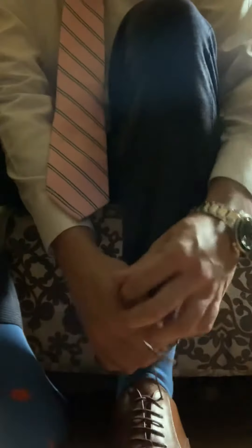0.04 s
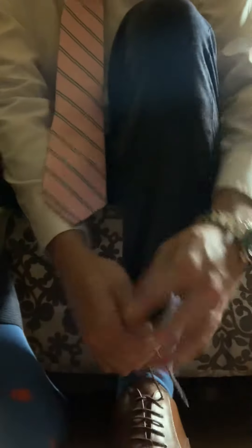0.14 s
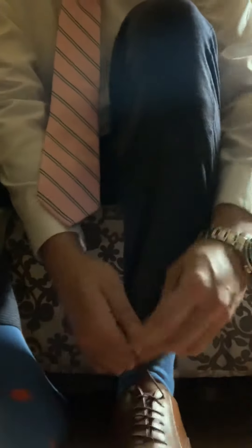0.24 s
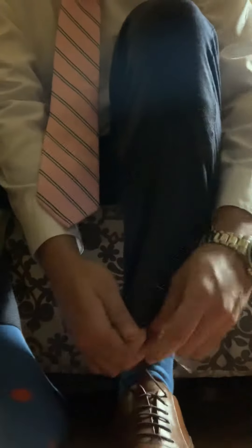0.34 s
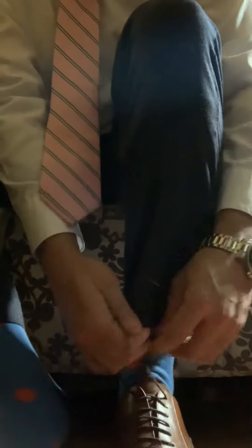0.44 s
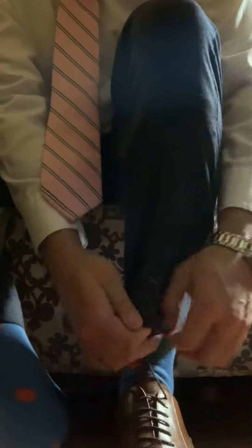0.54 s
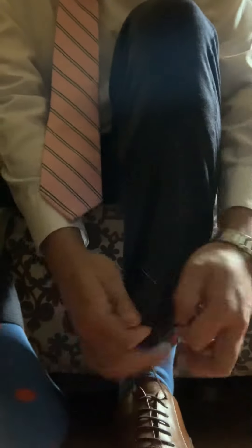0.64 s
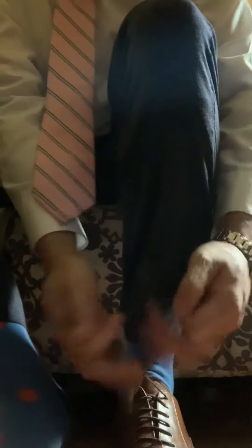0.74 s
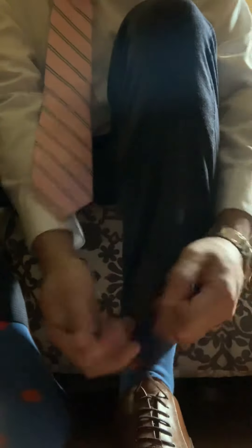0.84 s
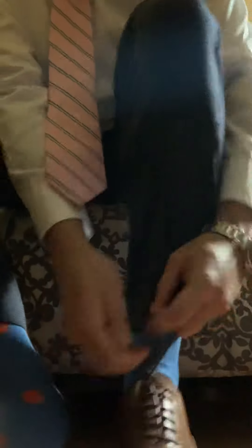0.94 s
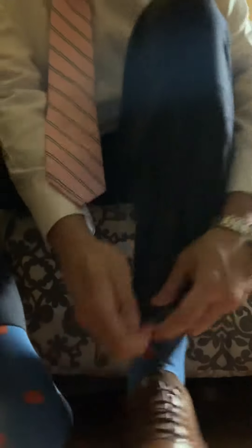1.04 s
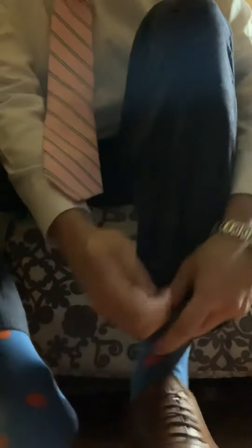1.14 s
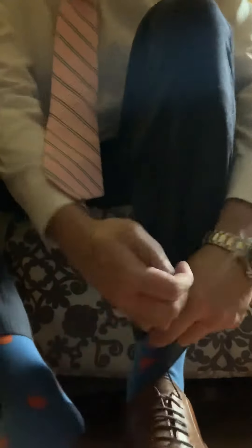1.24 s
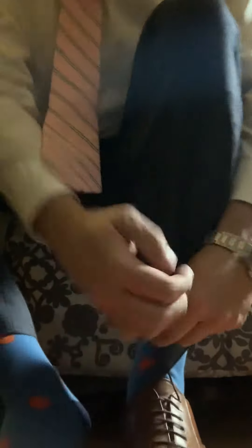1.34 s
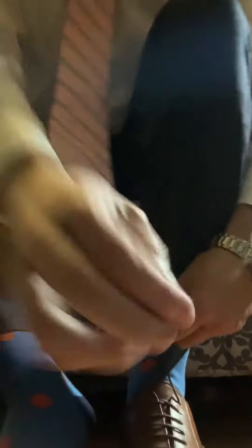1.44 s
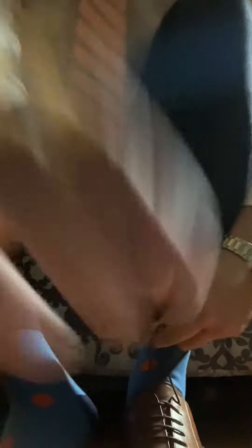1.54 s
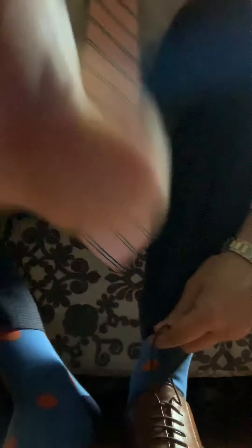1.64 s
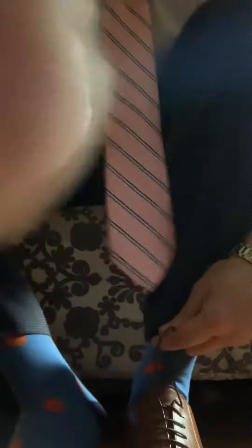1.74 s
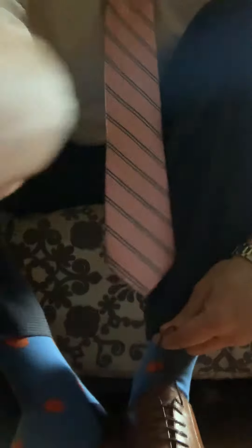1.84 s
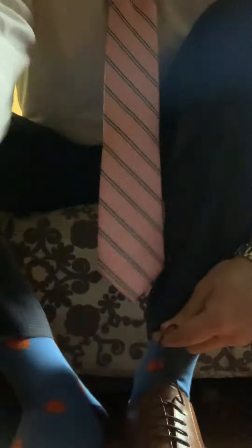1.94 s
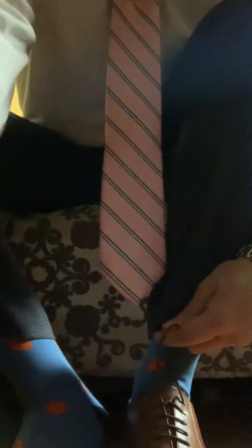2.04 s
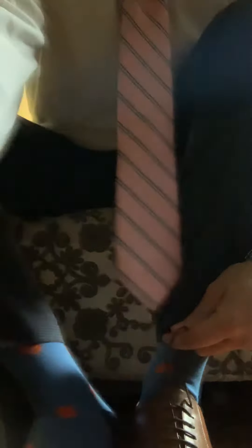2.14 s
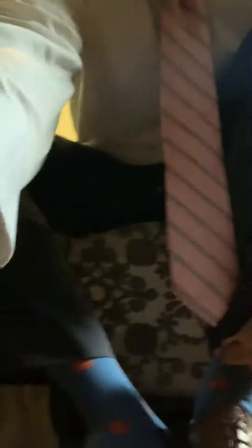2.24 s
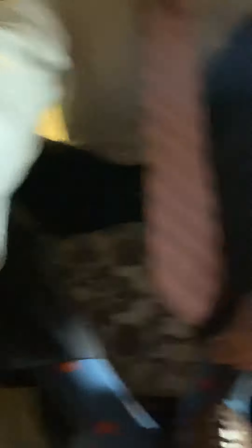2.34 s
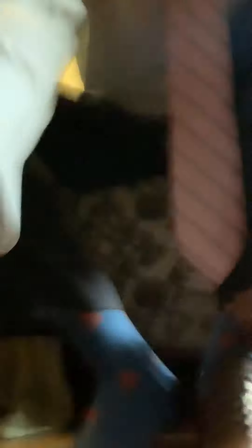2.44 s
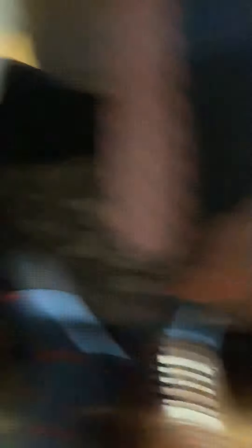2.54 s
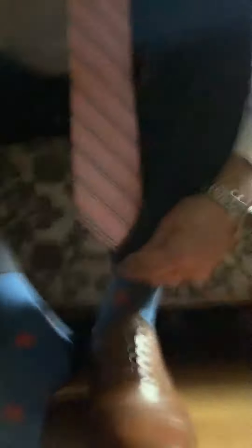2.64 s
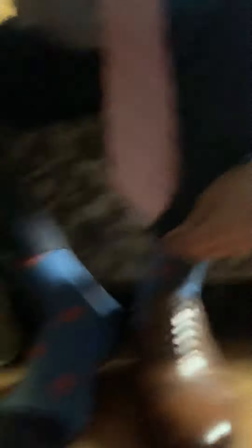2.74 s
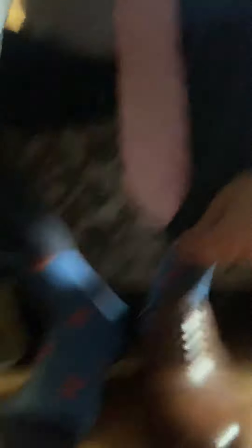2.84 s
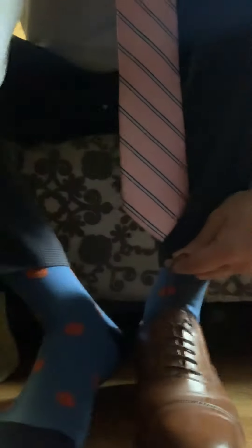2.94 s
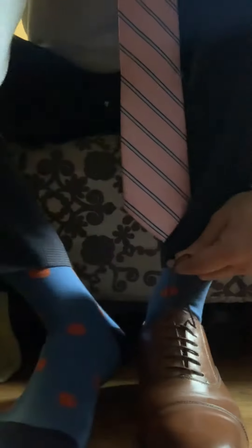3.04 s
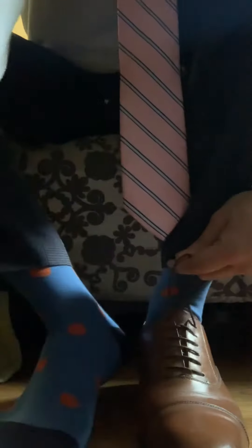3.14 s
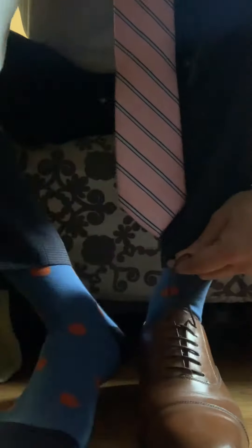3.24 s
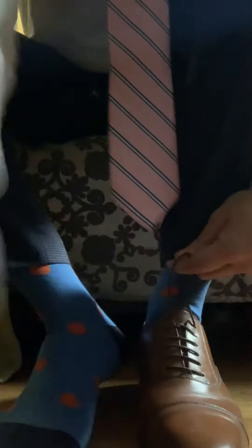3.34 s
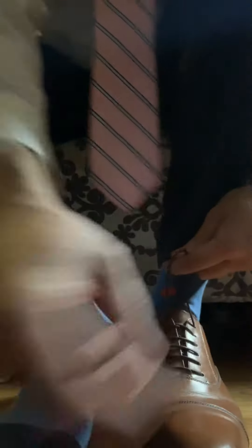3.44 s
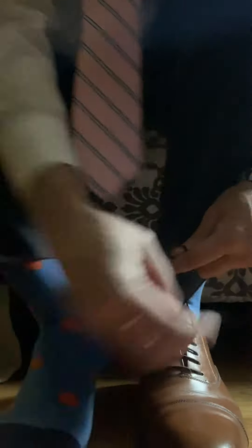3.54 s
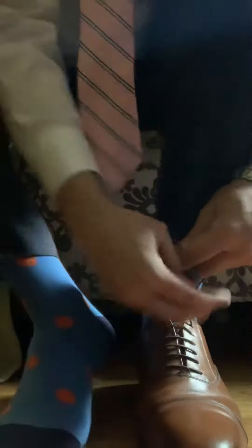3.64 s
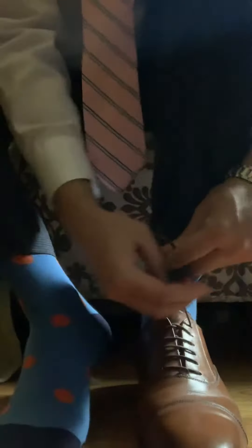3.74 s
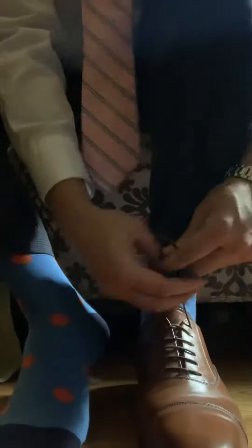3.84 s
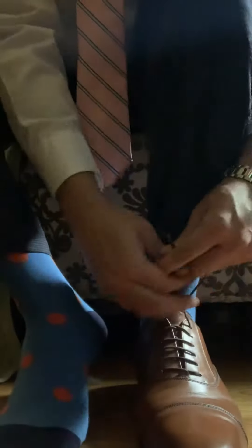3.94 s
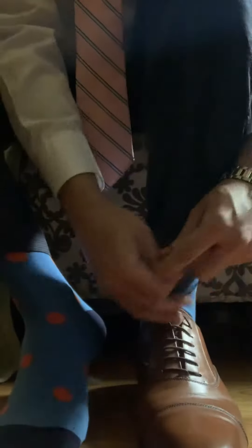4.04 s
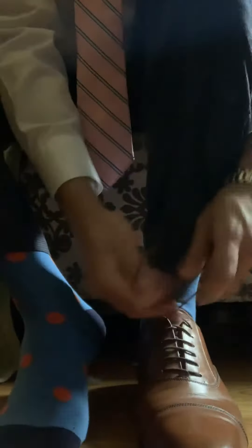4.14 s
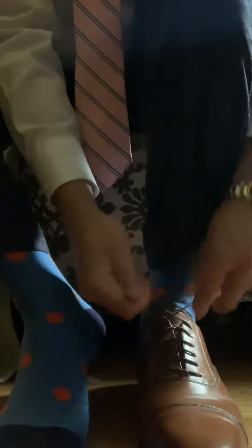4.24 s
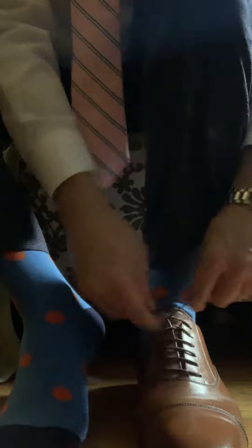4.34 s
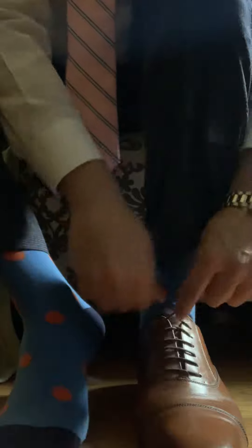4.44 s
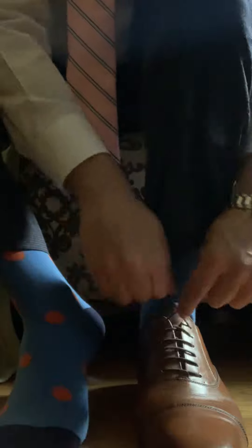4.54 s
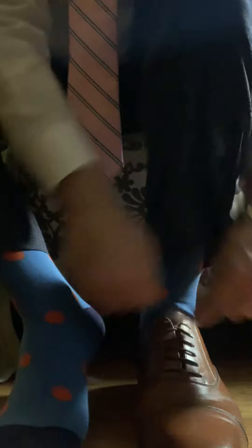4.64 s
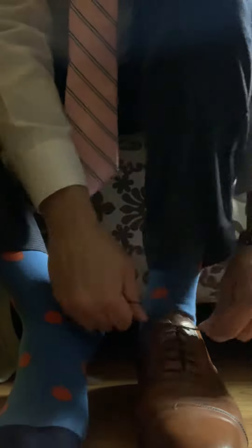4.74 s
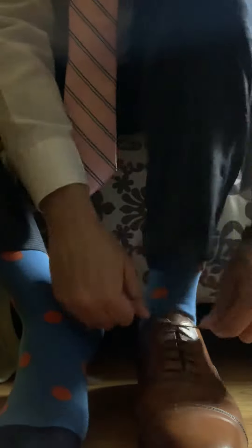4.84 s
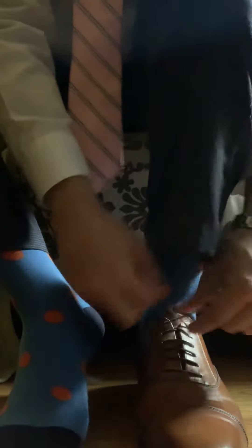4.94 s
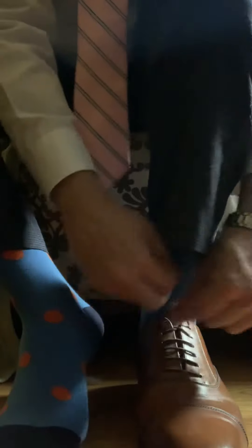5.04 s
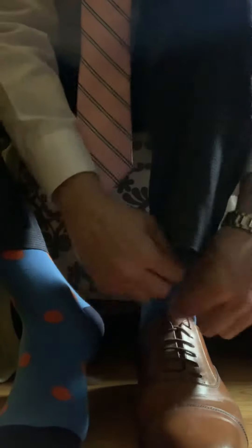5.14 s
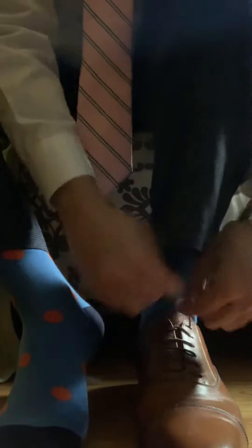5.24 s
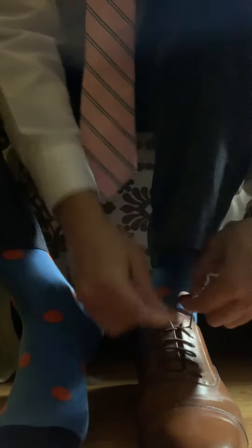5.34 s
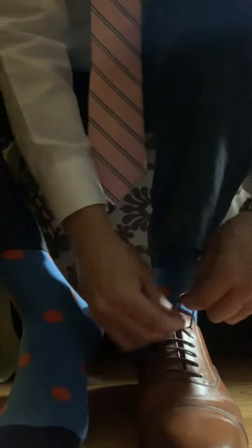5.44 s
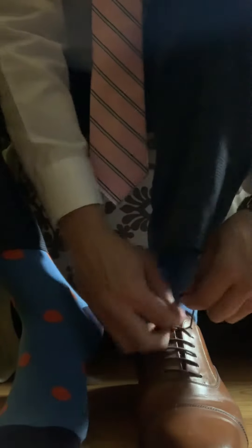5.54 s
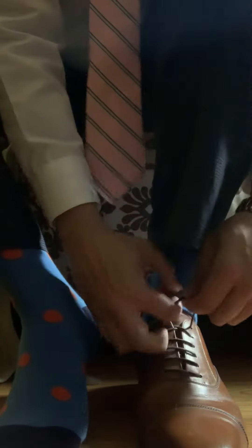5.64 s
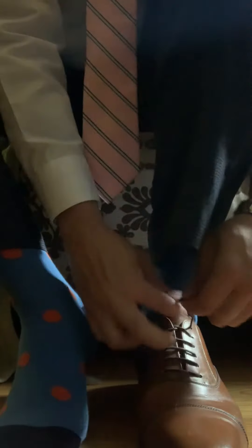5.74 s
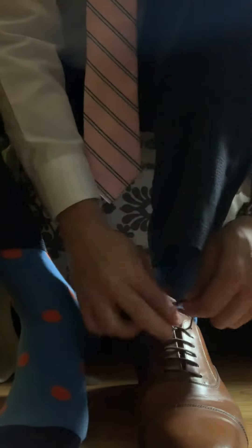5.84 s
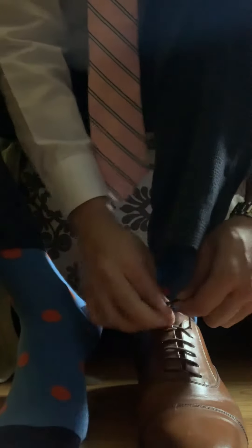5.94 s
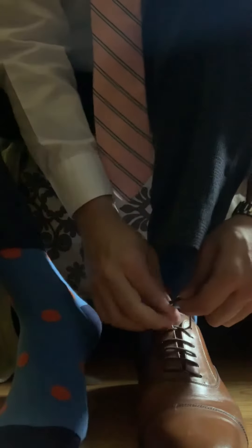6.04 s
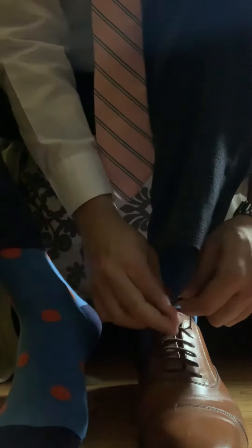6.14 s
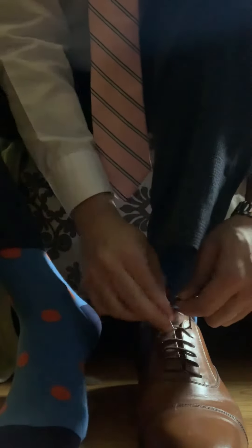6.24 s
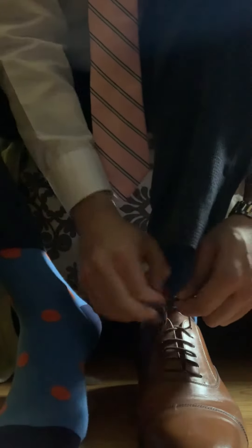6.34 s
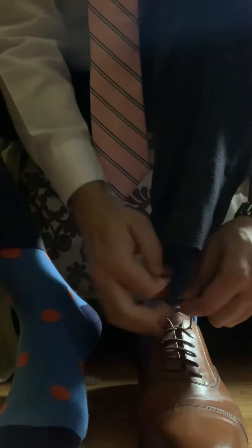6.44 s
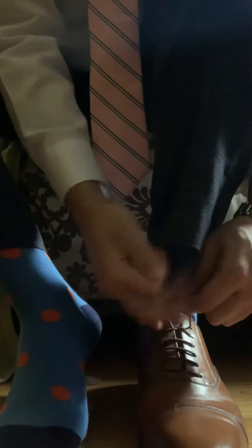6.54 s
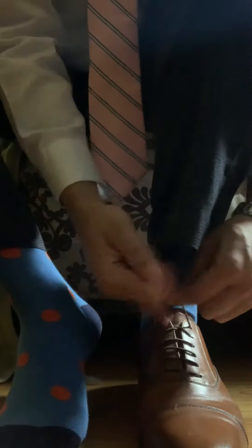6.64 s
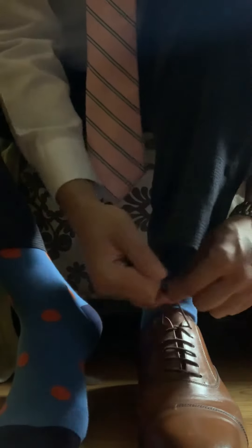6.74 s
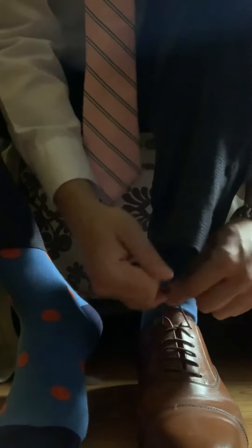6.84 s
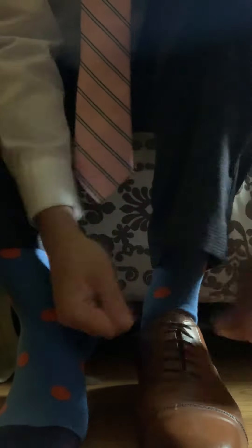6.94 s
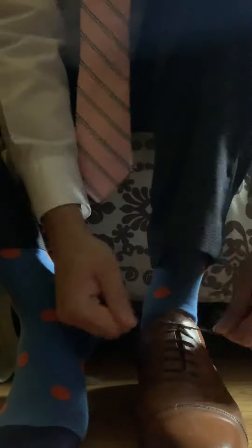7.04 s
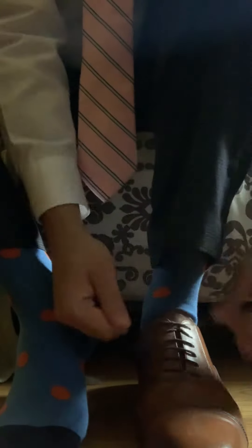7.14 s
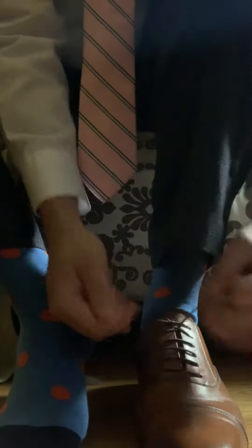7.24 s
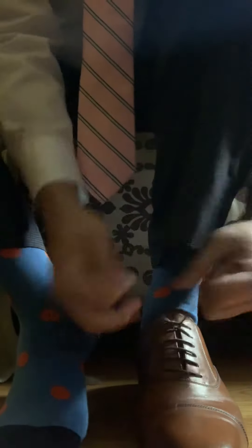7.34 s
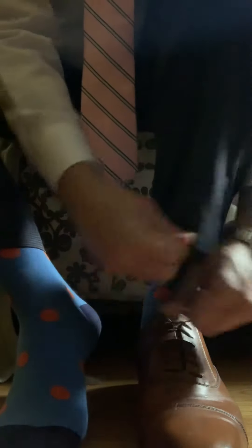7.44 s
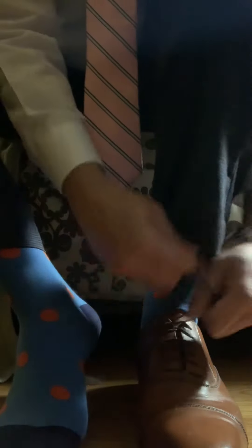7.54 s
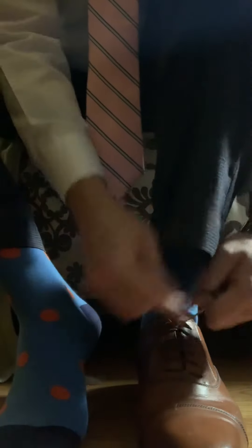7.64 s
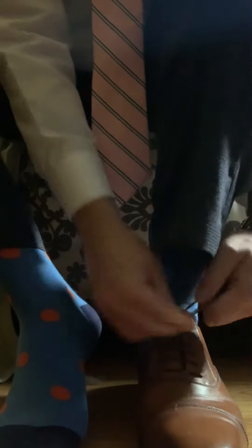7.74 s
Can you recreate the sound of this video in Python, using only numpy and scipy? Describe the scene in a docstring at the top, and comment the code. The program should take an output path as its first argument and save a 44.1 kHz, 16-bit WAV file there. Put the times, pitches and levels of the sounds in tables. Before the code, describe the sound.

A steady low ventilation rumble lies under everything in a small furnished room with a short, dull echo. From 0 to 0.9 s, sleeves and laces rustle softly with faint floor thuds near 0.4 and 0.7. At about 0.96 a lace rasps and gives a tiny rising chirp; at 1.09 a hard knock of shoe on boards clicks sharply, followed by bright ticks at 1.2. At 1.67 a hand seizes the microphone device: a loud boomy jolt, then scraping, low shuddering around 2.0, another thump at 2.2, rough skin drags at 2.45-2.75, and a heavy thud at 2.89. Handling fades by 3.2. A softer knock falls at 3.5. From then to nearly 8 s come quiet, dry lace strokes and cloth rubs, light taps near 5.06, a crisp click at 6.38, a stronger scratchy swish at 6.9, and small ticks around 7.1.

```python
"""Hands lace and tie a leather shoe on a wooden floor, close to a phone that stands there.
Sleeves, laces and skin are coloured noise grains under stroke envelopes; lace tips, shoe and boards
ring as decaying modes; a lace chirps by stick-slip. Between 1.66 and 3.2 s a hand holds and shifts
the phone: its case scrapes, shudders and jolts. A low room rumble lies underneath."""
import sys
import numpy as np
from scipy import signal
from scipy.fft import rfft, irfft, next_fast_len
from scipy.io import wavfile
from scipy.ndimage import uniform_filter1d

SR = 44100
rng = np.random.default_rng(int(sys.argv[2]) if len(sys.argv) > 2 else 0)


def attenuation_scalar(level_db):
    """Turn a level in dB into a linear amplitude multiplier (20 dB per decade)."""
    decades = np.asarray(level_db, float) / 20
    return 10 ** decades


def unload_audio(sound):
    """Save the sound as a 16-bit wav file, at the path given as the first command line argument."""
    columns = np.transpose(np.atleast_2d(sound))
    # keep every value between -1 and 1, then stretch to whole-number steps
    steps = np.round(np.clip(columns, -1, 1) * 32767)
    wavfile.write(sys.argv[1], SR, steps.astype(np.int16))


N = 343097

# spectrum of crisp fibre hiss: [f/Hz, relative level/dB]
FIBRE = [(1500, -31.5), (3000, -17.5), (5000, 0), (7000, 1.5), (9000, -0.5), (12000, 0), (15700, -1)]
# spectrum of a low scrape: [f/Hz, relative level/dB]
SCRAPE = [(300, -6.5), (700, 3.5), (1200, 7), (2200, -0.5), (2800, -4), (4000, -17), (8000, -47.5)]
# spectrum of skin on a smooth surface: [f/Hz, relative level/dB]
SKIN = [(1500, -29.5), (2700, -2.5), (3200, 4), (4500, -5.5), (6000, -6.5), (8000, -9.5), (12000, -42)]


def rustle():
    """Cloth and lace rub: a dull noise and a crisp hiss of fibres, slow shifts plus single strokes."""
    # spectrum of the dull rub: [f/Hz, relative level/dB]
    rub_colour = [(300, -25.5), (700, -1.5), (1200, 2), (1800, 1), (2500, -1.5), (3500, -3), (5000, -7.5),
                  (7000, -13), (10000, -33)]
    # slow shifts of sleeves and trousers, before and after the phone is moved:
    # two curves of [t/s, dull rub/dB, fibre hiss/dB]
    cloth = [
        [(0.0, -55, -63), (0.15, -66.5, -75), (0.6, -70.5, -72), (0.68, -64, -64.5), (0.93, -61, -56.5),
         (1.05, -61.5, -62), (1.4, -61.5, -73.5), (1.659, -57, -65.5)],
        [(3.2, -81, -84), (3.35, -65.5, -75), (3.93, -61, -78), (4.4, -61.5, -62.5), (4.55, -63.5, -86),
         (4.97, -73, -82), (5.15, -63.5, -69), (5.45, -68, -87), (6.28, -75.5, -95), (6.5, -61.5, -79),
         (6.85, -65.5, -83.5), (7.06, -80, -81.5), (7.3, -62, -62), (7.7, -79, -82.5)],
    ]
    # strokes of lace and fingers over leather and cloth:
    # [peak t/s, rise/s, fall/s, dull rub/dB, fibre hiss/dB]
    lace_strokes = [(.122, .2, .2, -73, -64), (.332, 0.43, 0.31, -60, -69),
                    (.96, 0.025, 0.031, -39.5, -50.5), (.99, 0.045, 0.055, -59.5, -51),
                    (1.086, .02, 0.044, -52.5, -64.5), (1.215, .05, 0.087, -56.5, -47.5),
                    (1.31, .2, 0.068, -55, -58.5), (3.499, .07, 0.1, -67, -64),
                    (3.714, 0.12, 0.18, -85, -59), (4.274, 0.59, 0.12, -64.5, -58),
                    (4.434, 0.16, 0.089, -55.5, -62.5), (4.685, 0.19, 0.18, -60, -67.5),
                    (4.878, .04, 0.12, -65, -62.5), (5.06, 0.019, 0.16, -61.5, -60.5),
                    (5.225, .1, 0.21, -58, -81), (5.31, 0.083, 0.047, -61, -54),
                    (5.428, .035, 0.025, -66, -60), (5.579, 0.064, 0.055, -59, -50.5),
                    (5.687, .18, 0.034, -70, -58.5), (5.762, 0.031, 0.049, -60, -51),
                    (5.981, 0.29, 0.16, -60.5, -73.5), (6.165, 0.086, 0.14, -66.5, -72),
                    (6.323, 0.024, 0.11, -70, -62), (6.387, 0.053, 0.035, -60.5, -57),
                    (6.503, 0.017, .11, -71, -56), (6.638, 0.076, 0.064, -63.5, -59),
                    (6.874, 0.0071, 0.15, -50.5, -52), (6.945, 0.065, 0.051, -47.5, -45.5),
                    (7.139, 0.077, 0.25, -62.5, -61.5), (7.432, 0.17, 0.24, -58, -62),
                    (7.634, 0.079, .06, -69, -60.5), (7.775, 0.077, 0.064, -67.5, -62)]
    dull, crisp = strokes(lace_strokes)
    dull = np.hypot(level(cloth, order=1), dull)
    rub = dull * grains(rub_colour, spiky_db=0.0, clump_db=1.0, patchy_db=3.5)
    crisp = np.hypot(level(cloth, order=2), crisp)
    hiss = crisp * grains(FIBRE, spiky_db=1.9, clump_db=2.0, patchy_db=5.0)
    return rub + hiss


def squeak():
    """A waxed lace chirps through an eyelet: uneven stick-slip, faster as the lace runs out."""
    # chirp: [t/s, level/dB, mean slip rate/Hz]
    chirp = [(0.949, -55.5, 1480), (0.964, -46.5, 1360), (0.97, -31, 1450), (.976, -31.5, 2670),
             (0.979, -33, 2700), (0.989, -51, 3700)]
    s, db, rate_hz = np.transpose(chirp)
    t = np.arange(s[0], s[-1], 1 / SR)
    wobble = 1 + 0.79 * uniform_filter1d(rng.standard_normal(len(t)), size=30)
    turns = np.cumsum(np.interp(t, s, rate_hz) * wobble) / SR
    slips = sum(np.cos(2 * np.pi * k * turns) * attenuation_scalar(-7. * k) for k in range(1, 4))
    out = np.zeros(N)
    add(out, s[0], attenuation_scalar(np.interp(t, s, db)) * evened(slips))
    return out


def ticks():
    """Lace tips and fingernails: modes near the centre pitch ring briefly over a wide snap."""
    # contacts, a harder one favours higher modes: [t/s, ring peak/dB, centre f/Hz]
    contacts = [(.659, -46, 1810), (1.0938, -21, 2340), (1.110, -36.5, 7800), (1.204, -32.5, 7500),
                (1.211, -39.5, 5400), (1.6703, -34, 1900), (1.7003, -33, 1690), (1.7057, -30.5, 1790),
                (1.762, -26, 1610), (2.021, -27.5, 7900), (2.213, -41, 1200), (2.226, -39.5, 8000),
                (2.271, -46, 5100), (2.321, -45, 1770), (2.454, -58, 1190), (2.466, -39.5, 1374),
                (2.776, -32.5, 1650), (2.967, -27, 2600), (3.3233, -45, 1750), (3.4998, -38.5, 4500),
                (3.5756, -44.5, 1670), (3.702, -40, 8060), (3.755, -44, 8060), (4.6, -44, 1690),
                (4.867, -39.5, 3000), (5.0624, -33.5, 2700), (5.219, -42.5, 1600), (5.567, -42.5, 1610),
                (5.8737, -42, 1900), (6.1635, -37.5, 2700), (6.3753, -38, 1750), (6.3843, -25.5, 4800),
                (7.0395, -40.5, 8000), (7.1134, -50, 8000), (7.124, -37, 8050), (7.131, -45, 5000),
                (7.152, -44, 5500), (7.6347, -49.5, 1600)]
    # modes of a lace tip: [f/Hz, level/dB, decay to 1/e/cycles]
    tip_modes = [(1280, -4, 3), (1660, 6.5, 2.8), (2130, -3.5, 2.5), (2860, -6, 2.6), (4600, 2, 2.1),
                 (7900, 2, 4)]
    focus_db = 17  # loss of a mode one octave from the centre; grows with octaves squared
    snap_hz = 45000  # snap gain = centre_hz / snap_hz
    out, t = np.zeros(N), np.arange(400) / SR
    snaps = rng.standard_normal((len(contacts), 400))
    hz, db, cycles = np.transpose(tip_modes)[:, :, None]
    modes = np.sin(2 * np.pi * hz * t) * np.exp(-t * hz / np.maximum(cycles, .3))
    for (s, peak_db, centre_hz), noise in zip(contacts, snaps):
        ringing = (attenuation_scalar(db - focus_db * np.log2(hz / centre_hz) ** 2) * modes).sum(0)
        ringing /= abs(ringing).max()
        snap = centre_hz / snap_hz * np.diff(noise, prepend=0) * np.exp(-t / 0.001)
        add(out, s, attenuation_scalar(peak_db) * (ringing + snap))
    return out


def knocks():
    """Each blow rings the floorboards and, more or less, the hollow shoe."""
    # blows: [t/s, board peak/dB, hardness/dB per octave, board t60 factor, shoe over boards/dB]
    blows = [(.381, -21.5, 0.5, 1.8, -18.5), (0.389, -28.5, -16, 1.1, -17), (.685, -32.5, -4.5, 1.7, -18),
             (1.085, -39.5, 5, 1.1, 5), (1.093, -9.5, 5.5, 0.76, 1), (1.0974, -9.5, 0, 0.5, -18.5),
             (1.114, -26.5, 0, 0.9, -14.5), (1.388, -30.5, 1.5, 1.6, -16.5), (1.6718, -11, 2, 0.54, -18.5),
             (1.677, -14, 0, .5, -24), (2.269, -16.5, 6.5, 0.25, -7), (6.943, -33, 7, 1.4, -23),
             (2.888, -27.5, -1, 0.44, -6), (3.496, -22, 3.5, 1.1, -15), (4.107, -35, 2.5, 1.6, -21.5),
             (5.062, -25.5, -4.5, 1.7, -30)]
    # modes of the boards: [f/Hz, level/dB, unscaled t60/s]
    boards = [(143.6, 0.5, .05), (294.4, 5.5, 0.048), (470, -1.5, 0.041), (657, -13, 0.022),
              (854, -15, 0.024), (1600, -22.5, 0.017), (2340, -27.5, 0.013), (2900, -31, 0.015)]
    # modes of the leather body: [f/Hz, level/dB, t60/s]
    shoe = [(1060, 0, .022), (1240, -1, .018)]
    out = np.zeros(N)
    for s, peak_db, hard_db, free, shoe_db in blows:
        blow = ring(boards, hard_db, free) + attenuation_scalar(shoe_db) * ring(shoe, hard_db=0, free=1)
        add(out, s, attenuation_scalar(peak_db) * blow)
    return out


def scuffs():
    """Short rough drags of leather and skin: quick start, slower fade."""
    # drags: [t/s, low rasp/dB, bright rasp/dB, length/s]
    drags = [(0.952, -52, -41, 0.049), (1.09, -41.5, -54, 0.054), (1.172, -48, -69, .022),
             (1.771, -49, -51.5, 0.12), (2.156, -39, -61, 0.0091), (2.208, -37, -64, 0.017),
             (2.451, -48.5, -60, 0.016), (2.57, -33, -46, .085), (2.666, -47, -65, .014),
             (2.715, -41, -52, .07), (4.673, -62.5, -69, 0.028), (5.293, -54.5, -65, 0.024),
             (6.887, -56.5, -58, 0.054), (6.916, -44, -63, 0.069)]
    low, bright = np.zeros((2, N))
    for s, low_db, bright_db, length_s in drags:
        progress = np.linspace(0, 1, round(max(length_s, .002) * SR))
        stroke = np.sin(np.pi * progress ** 0.31)
        add(low, s, attenuation_scalar(low_db) * stroke)
        add(bright, s, attenuation_scalar(bright_db) * stroke)
    low = low * grains(SCRAPE, spiky_db=3.0, clump_db=2.5, patchy_db=1.5)
    return low + bright * grains(SKIN, spiky_db=-1.5, clump_db=0.0, patchy_db=4.5)


def grip():
    """A hand rests on the phone, skin drags over the case, and the case shudders on the floor."""
    # finger slides: [peak t/s, rise/s, fall/s, scrape/dB, skin hiss/dB, fibre hiss/dB]
    slides = [(1.684, 0.029, .14, -42, -52.5, -54), (1.824, 0.09, 0.051, -42.5, -41, -50.5),
              (1.86, .1, 0.027, -59.5, -56, -53.5), (1.98, 0.014, 0.12, -43, -70, -74),
              (2.009, .05, 0.14, -43.5, -53.5, -61.5), (2.222, .1, 0.026, -42, -53, -70.5),
              (2.466, 0.0086, 0.047, -40.5, -44.5, -62), (2.53, 0.04, .12, -38, -40.5, -50.5),
              (2.6, 0.082, 0.05, -47, -37.5, -52), (2.64, 0.079, 0.012, -53.5, -41.5, -56),
              (2.762, 0.02, 0.068, -42, -54.5, -78), (2.894, 0.14, 0.12, -46, -59.5, -74),
              (3.058, 0.27, 0.15, -50.5, -69, -82)]
    # case shudders: [peak t/s, rise/s, fall/s, level/dB]
    shakes = [(1.76, .08, .3, -44.5), (1.86, .25, .04, -38.5), (1.982, .013, 0.11, -25.5),
              (2.035, .1, .09, -32), (2.2, .13, 0.11, -36.5), (2.94, .25, .5, -47)]
    # spectrum of the shudder: [f/Hz, relative level/dB]
    shudder_colour = [(60, -13.5), (120, 3.5), (200, 3.5), (300, -3.5), (500, -13.5), (1000, -26.5),
                      (2000, -56.5)]
    # time the hand rests on the phone: [from/s, to/s]
    held_s = (1.66, 3.2)
    # resting hand: [scrape/dB, skin hiss/dB, fibre hiss/dB, shudder/dB]
    held_db = (-65, -73, -82, -58)
    t = np.arange(N) / SR
    held = (t > held_s[0]) & (t < held_s[1])
    rest = attenuation_scalar(np.array(held_db))[:, None] * held
    moves = np.vstack([strokes(slides), strokes(shakes)])
    low, skin, crisp, shake = np.hypot(rest, moves)
    scrape = low * grains(SCRAPE, spiky_db=2.5, clump_db=3.0, patchy_db=4.5)
    squeal = skin * grains(SKIN, spiky_db=2.0, clump_db=2.5, patchy_db=2.0)
    hiss = crisp * grains(FIBRE, spiky_db=-2.0, clump_db=2.5, patchy_db=4.5)
    shudder = shake * grains(shudder_colour, spiky_db=0.0, clump_db=2.0, patchy_db=1.5, size=2048)
    return scrape + squeal + hiss + shudder


def jolts():
    """The phone rocks on its base: a hard first swing, then a softer wobble at a lower pitch."""
    # jolts: [t/s, peak/dB, push direction/+-1, first f/Hz, settled f/Hz, wobble t60/s]
    pushes = [(1.6727, -2.5, 1, 507, 153.2, 0.14), (1.674, -12.5, 1, 115.5, 85, .12),
              (2.215, -9, -1, 90, 68, 0.16), (2.642, -13.5, 1, 122.3, 84.7, 0.078),
              (2.889, -1.5, -1, 198.7, 65.2, 0.11), (3.064, -21.5, 1, 189.7, 108.5, 0.054)]
    out, t = np.zeros(N), np.arange(SR // 3) / SR
    for s, peak_db, push, first_hz, settled_hz, t60_s in pushes:
        hz = settled_hz + (first_hz - settled_hz) * np.exp(-t * first_hz / 1.43)
        swing = np.sin(2 * np.pi * np.cumsum(hz) / SR) * (1 - np.exp(-t * first_hz)) ** 2
        swing *= attenuation_scalar(-60 * t / t60_s) * (1 + 8.4 * np.exp(-t * first_hz / 0.85))
        add(out, s, np.sign(push) * attenuation_scalar(peak_db) * swing / abs(swing).max())
    return out


def room(x):
    """Furnished room: a short diffuse tail, duller than the hit, different for each stream."""
    t60_s, gap_s = 0.21, .004
    t = np.arange(SR // 3) / SR
    tail = rng.standard_normal((2, len(t))) * attenuation_scalar(-60 * t / t60_s) * (t > gap_s)
    tail = signal.lfilter(*signal.butter(1, [150, 900], "bandpass", fs=SR), tail)
    return signal.fftconvolve(x[None], tail / np.linalg.norm(tail[0]), axes=1)[:, :N]


def rumble():
    """Ventilated room: steady low noise."""
    # spectrum of the room noise: [f/Hz, relative density/dB]
    rumble_colour = [(12, -36), (20, -0.5), (59, -1.5), (92, 1), (147, -10), (225, -23), (308, -19),
                     (434, -29), (592, -37.5), (745, -47), (1000, -42), (1300, -69.5), (2200, -120)]
    rms_db = -36
    return attenuation_scalar(rms_db) * grains(rumble_colour, spiky_db=1.17, clump_db=0.4, patchy_db=1.17, size=8192)


def grains(colour, spiky_db, clump_db, patchy_db, size=512):
    """Two unrelated rms-1 noise streams, clumped; colour varies at random in time-frequency patches."""
    clumps = evened(uniform_filter1d(rng.standard_normal(N), size=500))
    spikes = np.minimum(rng.exponential(1, N), 6)
    force = attenuation_scalar(clump_db * clumps + spiky_db * spikes)
    hz, _, z = signal.stft(force * rng.standard_normal((2, N)), SR, nperseg=size)
    patches = uniform_filter1d(rng.standard_normal(z.shape[1:]), size=3, axis=0)  # over frequency
    patches = evened(uniform_filter1d(patches, size=12, axis=1))  # over time
    z *= attenuation_scalar(read(colour, hz)[0][:, None] + patchy_db * patches)
    return evened(signal.istft(z, SR, nperseg=size)[1][:, :N])


def strokes(rows):
    """Gains over time, one per dB column: each stroke swells to its peak and dies; powers add."""
    fade_db = 20  # drop at one rise or fall time from the peak
    roundness = 1.164  # above 1: rounder top, steeper ends
    t, power = np.arange(0, N, 32) / SR, 0
    for s, rise_s, fall_s, *db in rows:
        away = np.where(t < s, (s - t) / max(rise_s, .004), (t - s) / max(fall_s, .004))
        drop_db = fade_db * np.minimum(away, 6) ** roundness
        power = power + attenuation_scalar(np.array(db)[:, None] - drop_db) ** 2
    return np.repeat(np.sqrt(power), 32, axis=1)[:, :N]


def level(curves, order):
    """Gain over time from dB column number `order` of the curves, silent between them."""
    t, out = np.arange(N) / SR, np.zeros(N)
    for rows in curves:
        rows = np.array(rows)
        out += attenuation_scalar(np.interp(t, rows[:, 0], rows[:, order], -200, -200))
    return uniform_filter1d(out, size=300)


def ring(modes, hard_db, free):
    """Decaying modes, peak 1: hits chirp down as the phone's processing delays lows; free scales t60."""
    hz, db, t60_s = np.transpose(modes)[:, :, None]
    delay_s = 0.0498 / np.sqrt(hz) - 0.0012
    since = np.maximum(np.arange(SR // 8) / SR - delay_s, 0)
    fade = attenuation_scalar(db + hard_db * np.log2(hz / 300) - 60 * since / (t60_s * max(free, .1)))
    onset = 1 - np.exp(-since * hz * 1.8)
    blow = (fade * onset * np.sin(2 * np.pi * hz * since)).sum(0)
    return blow / abs(blow).max()


def evened(x):
    """Scales to rms 1."""
    return x / np.sqrt(np.mean(x ** 2) + 1e-20)


def read(points, hz):
    """Columns of a table interpolated over log frequency."""
    f, *columns = np.transpose(points)
    return [np.interp(np.log(hz + 1), np.log(f + 1), c) for c in columns]


def add(mix, s, sound):
    """Mixes a sound in at s seconds."""
    part = mix[round(s * SR):][:len(sound)]
    part += sound[:len(part)]


def stereo(pair, table):
    """Left gets stream one, right a blend of both; the table's phase lead is split between them."""
    size = next_fast_len(N)
    lead, same = read(table, np.fft.rfftfreq(size, 1 / SR))
    same = np.clip(same, 0, 1)
    a, b = rfft(pair * np.ones((2, 1)), size)
    right = same * a + np.sqrt(1 - same ** 2) * b
    return irfft([a * np.exp(.5j * lead), right * np.exp(-.5j * lead)], size)[:, :N]


def scene():
    """Each group of sounds gets its own stereo phase table, including the phone's stereo processing."""
    # rustle, rumble, echo, open nearby sound: [f/Hz, left lead/rad, left-right likeness/0-1]
    open_phase = [(296, 0, 1), (590, -0.55, 0.47), (898, -3, 0.21), (1200, -0.3, 0.15), (2120, -1.73, 0.87),
                  (2700, -2, 0.93), (3170, -1.5, 0.37), (3420, -3.5, 0.14), (4000, -4.5, 0.68),
                  (5310, -4.5, 0.81), (7190, -3, 1), (9770, -3, 1), (12900, -2, 0.99), (14500, 1, .8),
                  (15900, 0.5, 0.91)]
    # knocks: [f/Hz, left lead/rad, left-right likeness/0-1]
    knock_phase = [(200, 0, 1), (500, -.4, 1), (1100, -1.1, .97), (2000, -1.7, .95), (4000, -2, .95)]
    # jolts and covered nearby sound: [f/Hz, left lead/rad, left-right likeness/0-1]
    case_phase = [(40, -.15, 1), (200, -.4, 1), (500, -.8, .95), (900, -2.3, .95), (1300, -3.14, 1),
                  (3400, -3.14, 1), (4000, -4.2, .7), (5000, -3, .7), (6000, -3.6, .85), (7200, -3.14, 1),
                  (10500, -3.14, 1), (12500, -2, .8), (15800, 0, .98)]
    # power share of nearby sound that takes the case table: [t/s, share/0-1]
    cover = [(1.681, 0.3), (1.701, 0.9), (1.73, 0), (2.0, 0.57), (2.5, 0.36), (2.58, 1), (2.74, 1),
             (2.79, .8), (2.951, 0.35), (3.2, 0)]
    blows, clicks = knocks(), ticks() + squeak()
    near = grip() + scuffs() + clicks
    covered = np.clip(np.interp(np.arange(N) / SR, *np.transpose(cover), 0, 0), 0, 1)
    echo = attenuation_scalar(-22.5) * room(blows + clicks)
    around = rumble() + rustle() + echo + np.sqrt(1 - covered) * near
    case = np.sqrt(covered) * near + jolts()
    return stereo(around, open_phase) + stereo(blows, knock_phase) + stereo(case, case_phase)


def band_limit(x):
    """A steep low-pass at the top of the band."""
    return signal.sosfilt(signal.butter(12, 16460, fs=SR, output="sos"), x)


def record(dry):
    """Steep low-pass at 15.85 kHz on the finished mix."""
    edge_hz = 15850
    lowpass = signal.firwin(511, edge_hz, window=("kaiser", 9), fs=SR)
    limited = signal.oaconvolve(dry, lowpass[None], "same")
    return band_limit(limited)


dry = scene()
out = record(dry)
unload_audio(out)
```